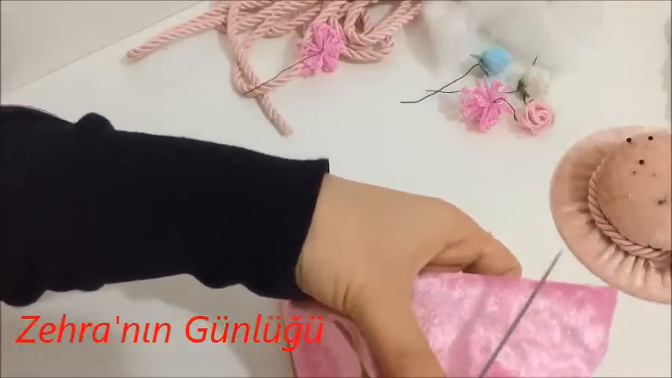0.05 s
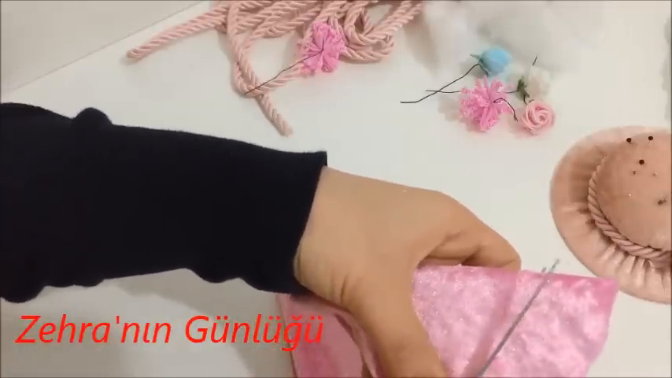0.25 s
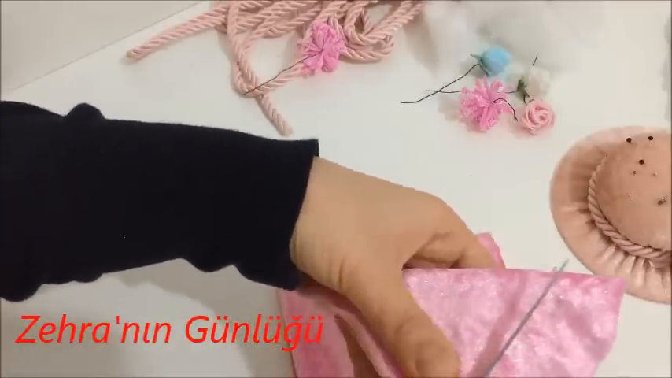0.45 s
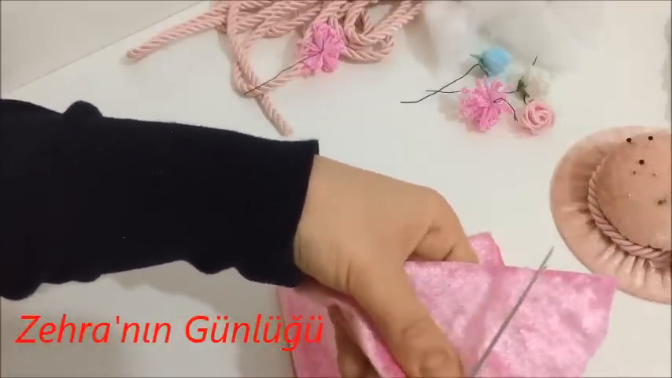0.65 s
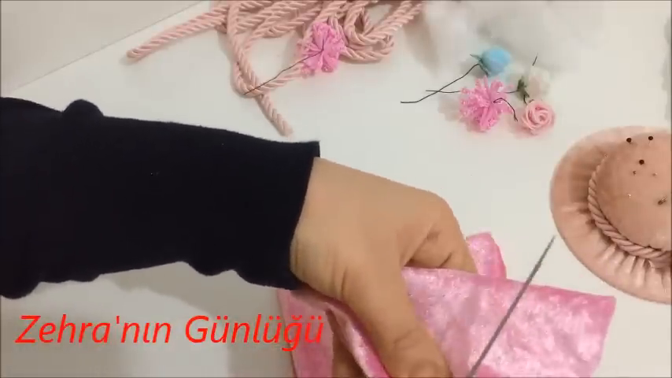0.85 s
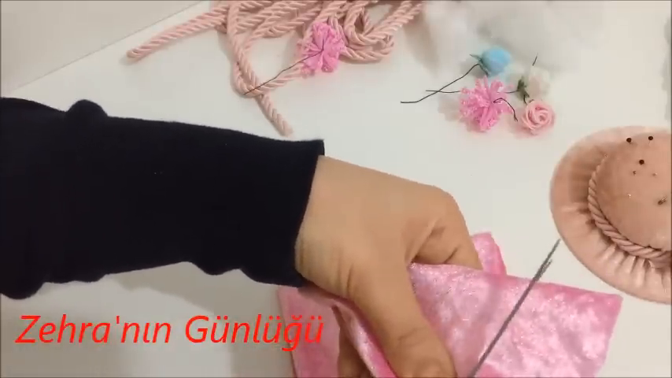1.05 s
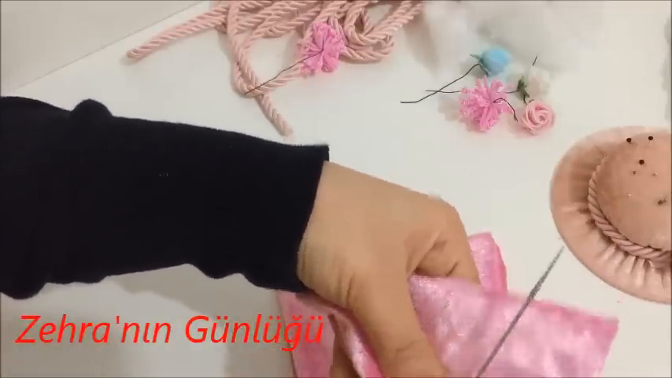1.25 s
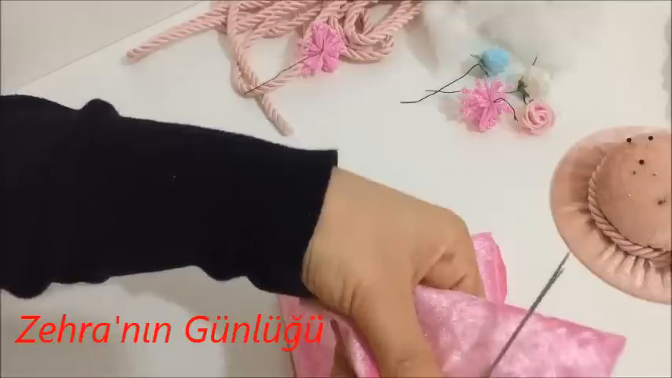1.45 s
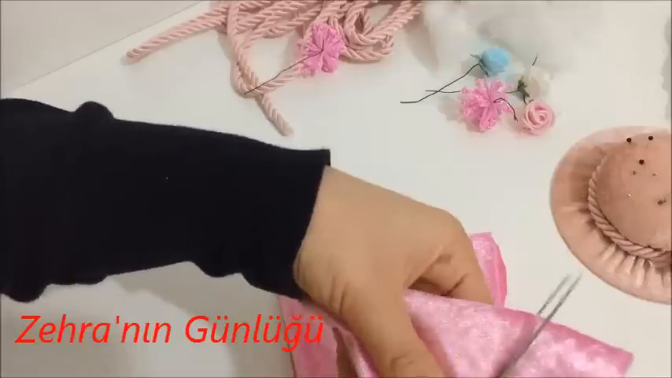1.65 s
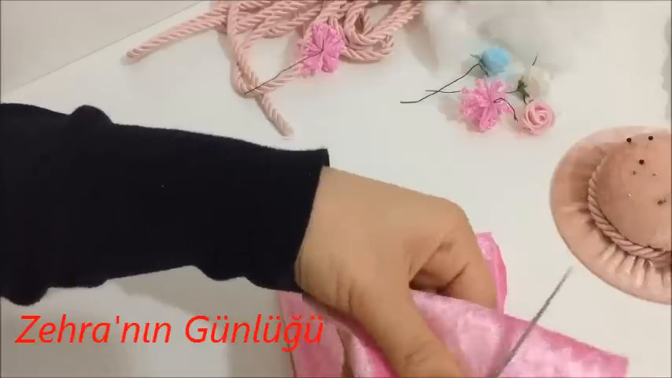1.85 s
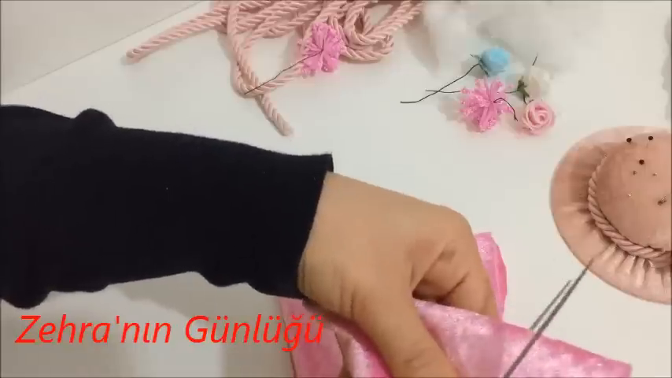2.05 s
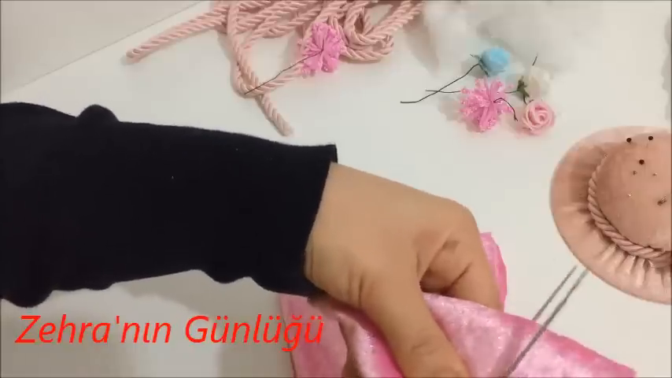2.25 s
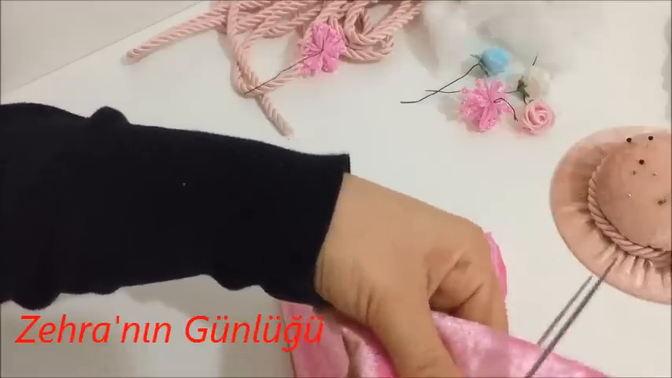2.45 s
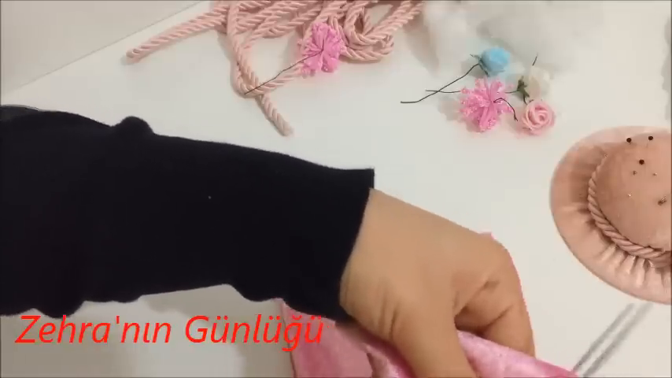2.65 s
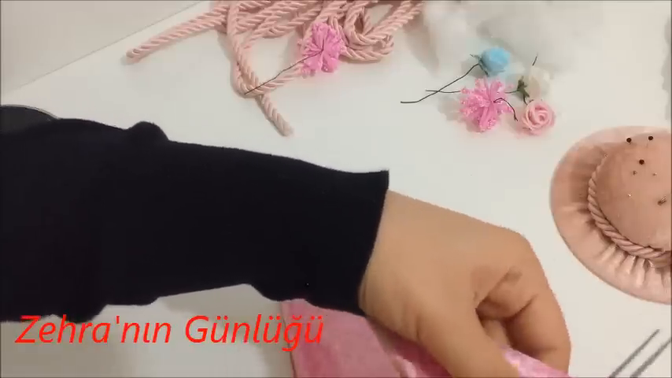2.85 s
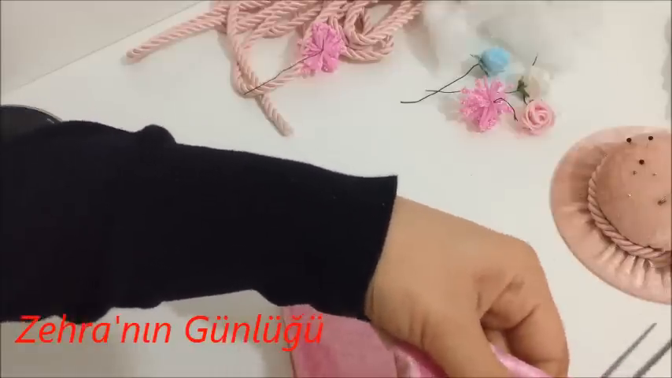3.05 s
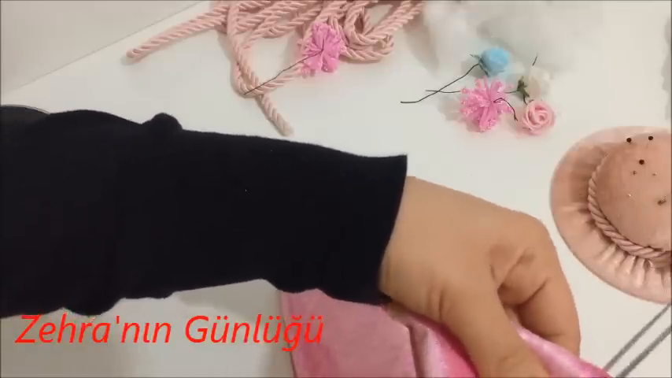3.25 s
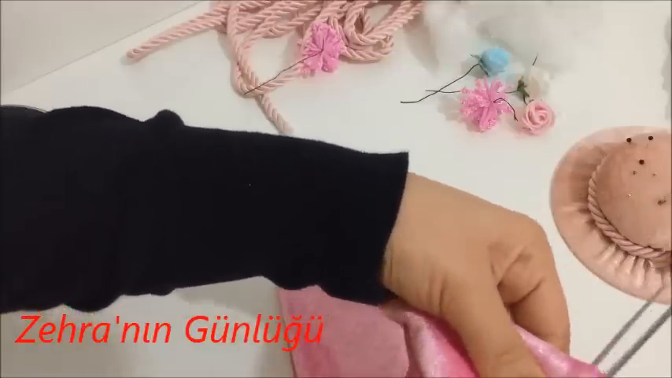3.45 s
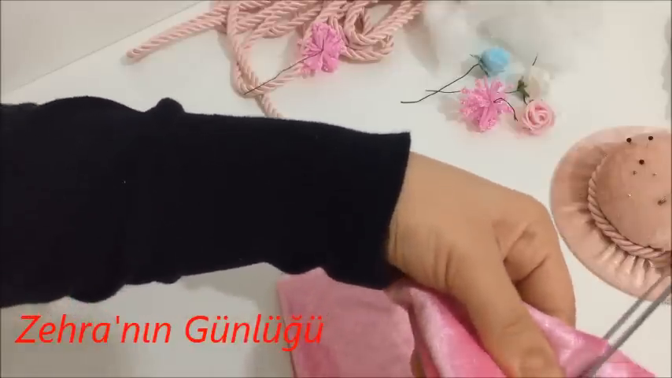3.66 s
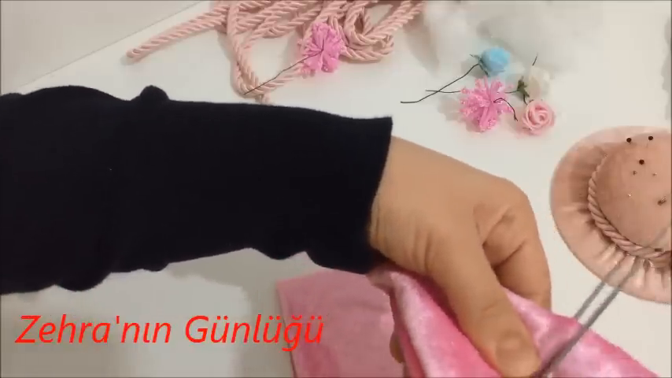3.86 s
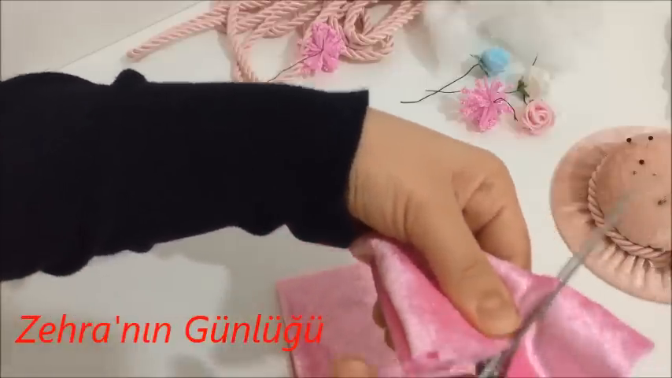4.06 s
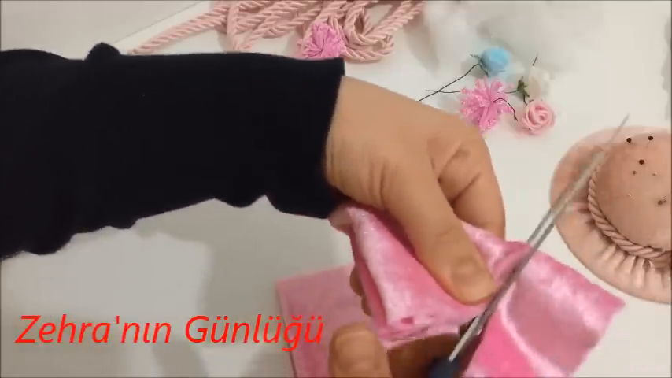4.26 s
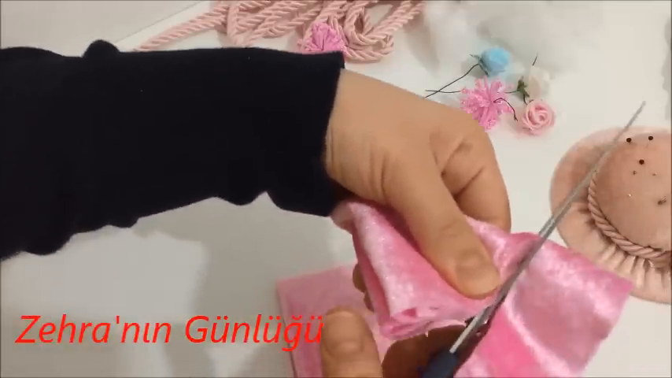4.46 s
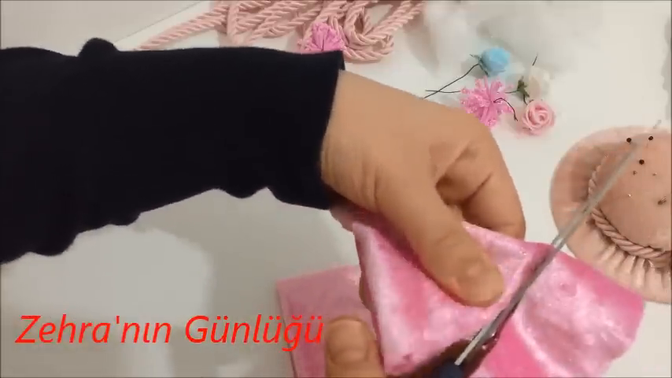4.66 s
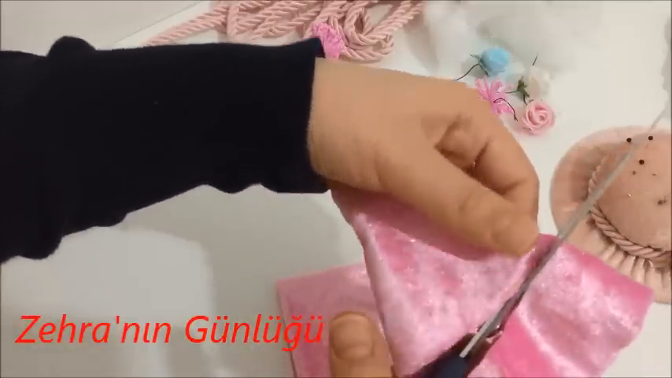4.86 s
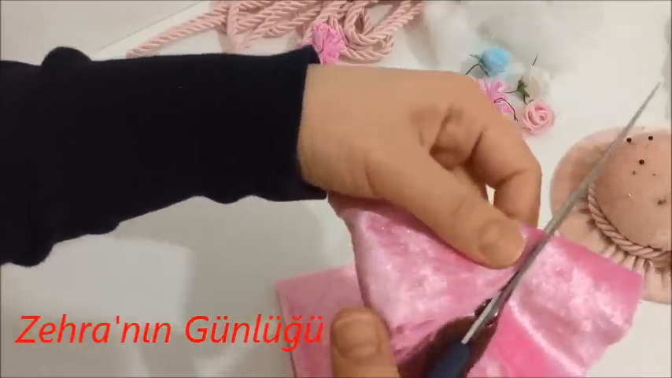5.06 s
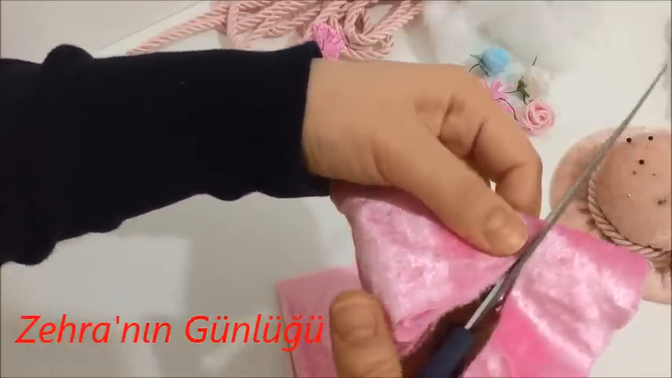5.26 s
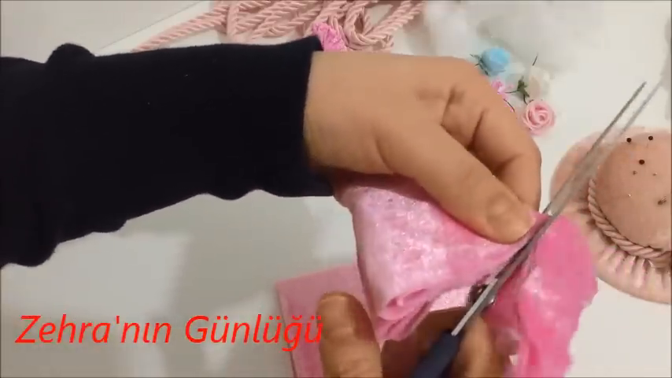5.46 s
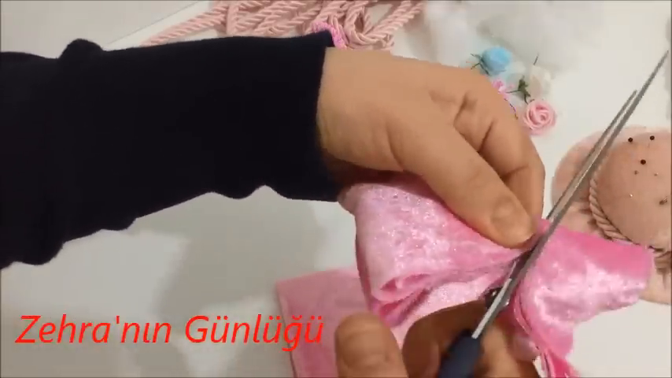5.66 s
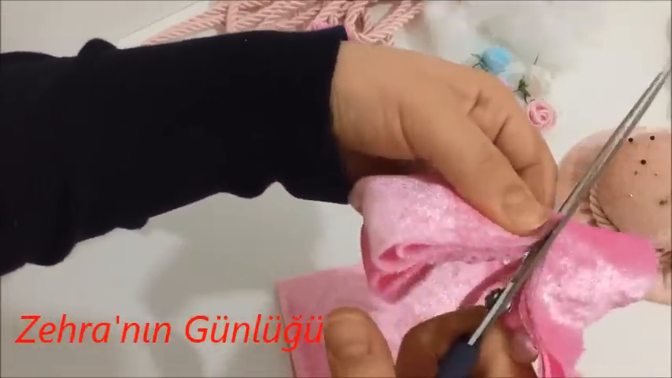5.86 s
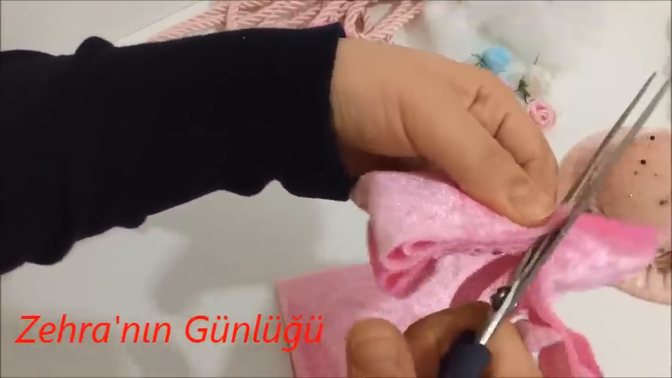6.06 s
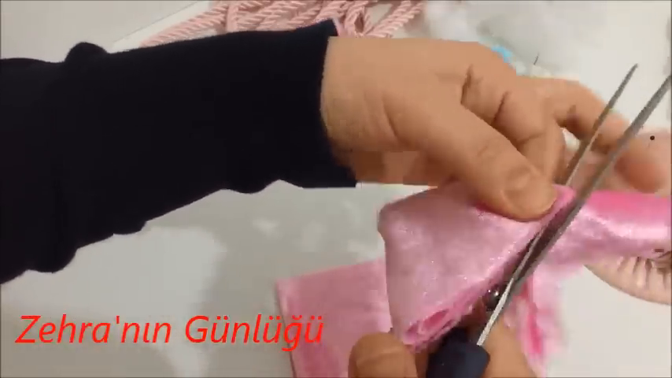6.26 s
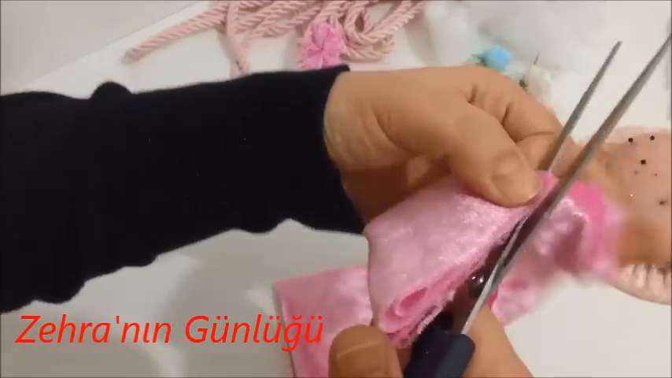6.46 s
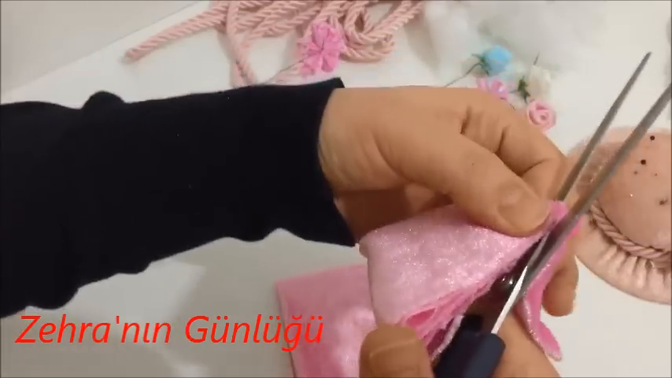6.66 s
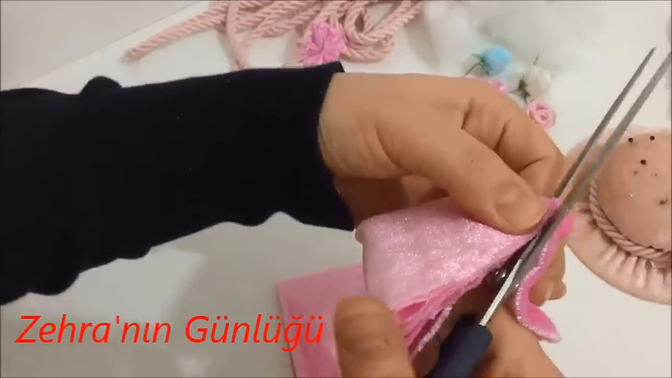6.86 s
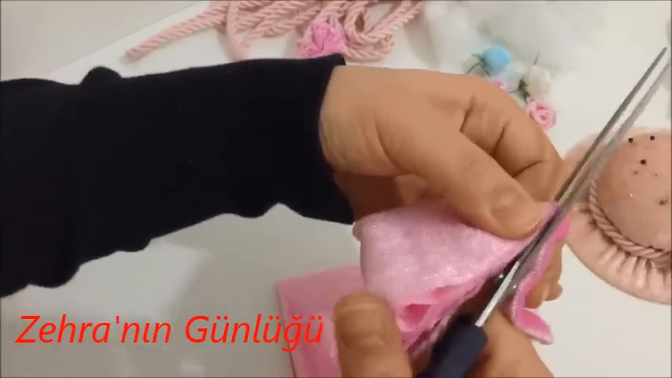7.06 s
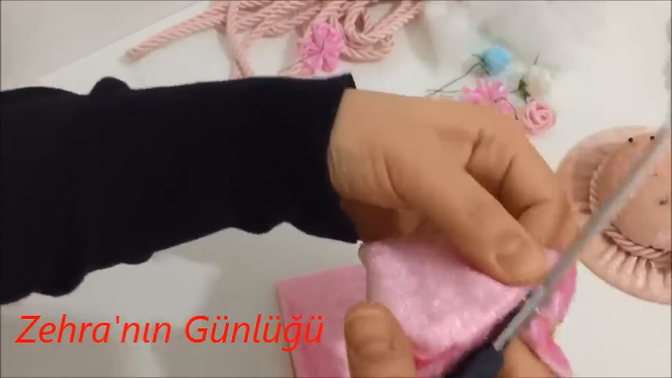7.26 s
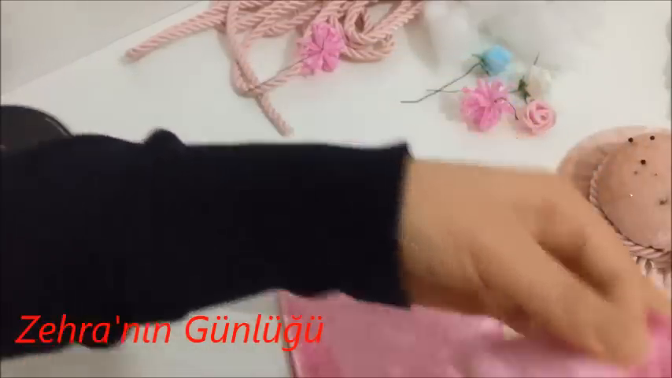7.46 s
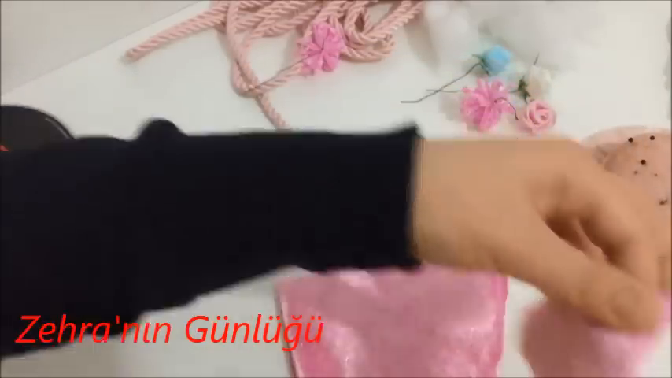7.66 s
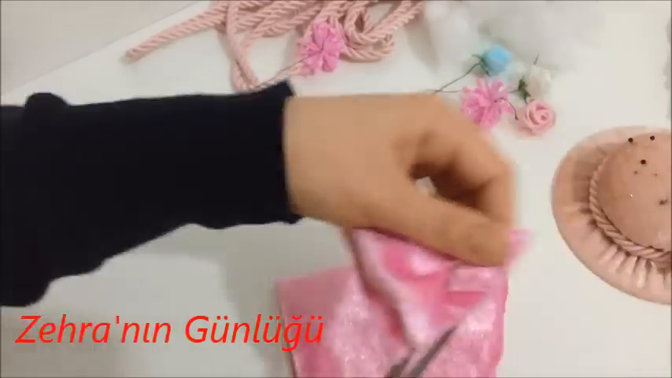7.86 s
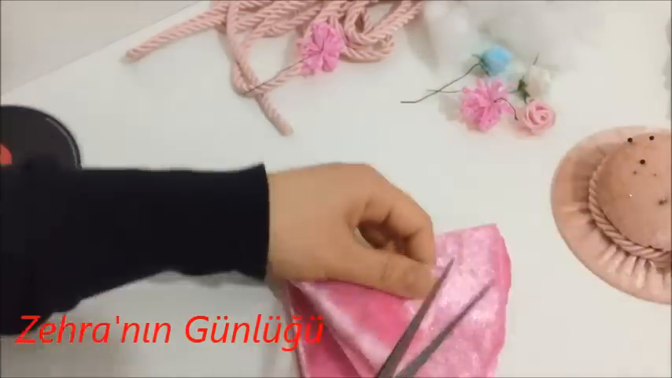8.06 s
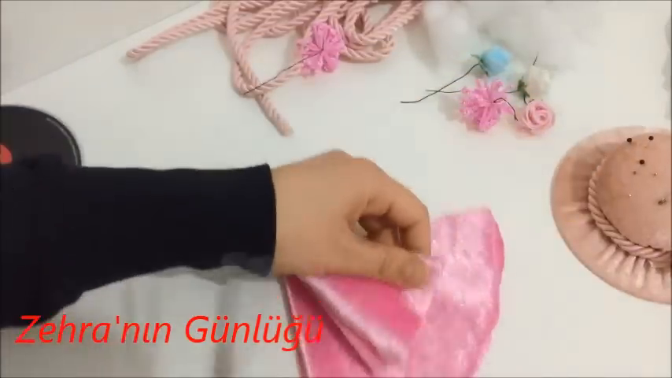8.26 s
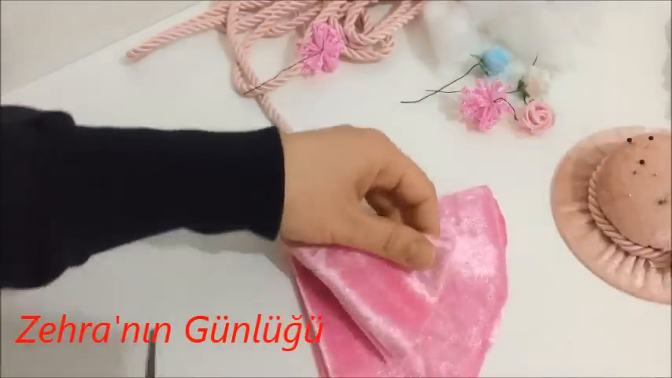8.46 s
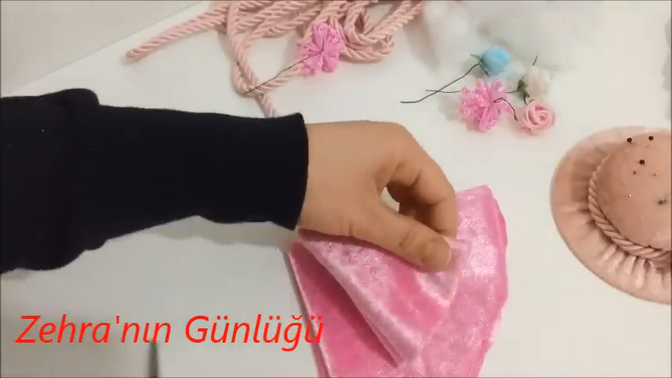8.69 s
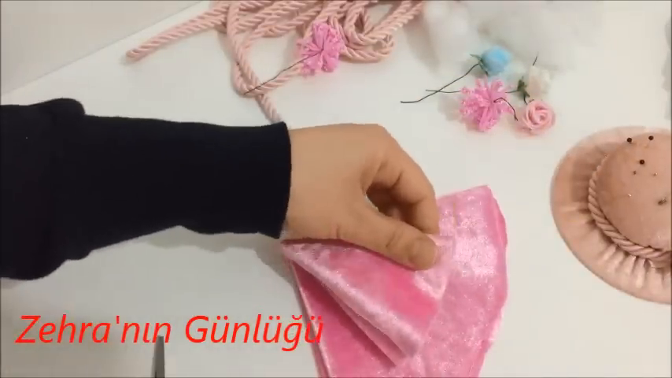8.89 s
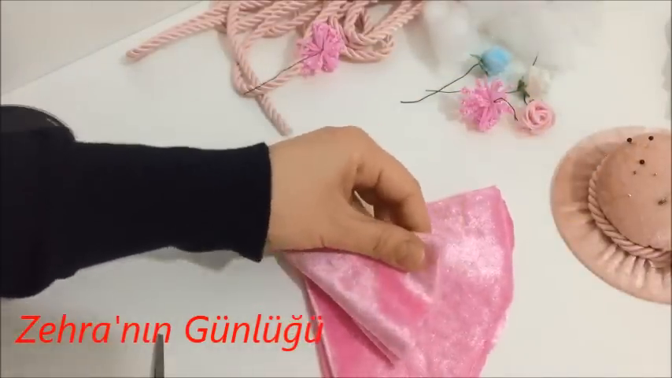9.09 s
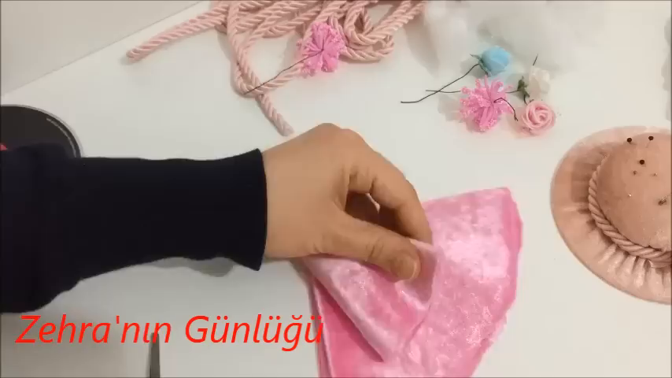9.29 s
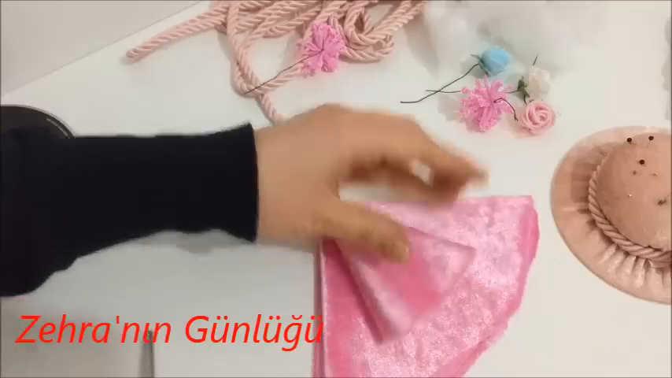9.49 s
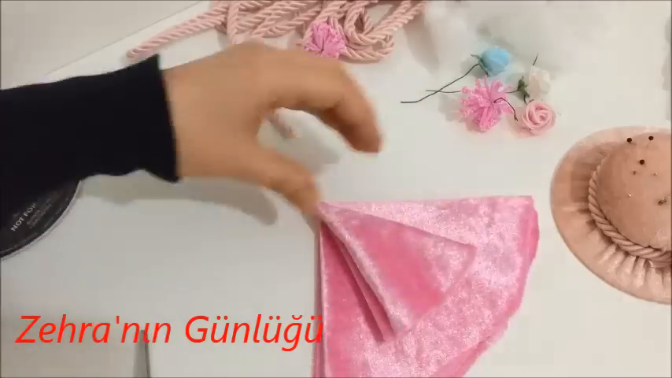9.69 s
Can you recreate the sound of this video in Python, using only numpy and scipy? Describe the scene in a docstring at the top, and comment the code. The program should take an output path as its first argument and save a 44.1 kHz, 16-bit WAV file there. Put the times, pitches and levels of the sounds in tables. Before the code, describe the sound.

Scissors snip repeatedly through folded cloth in a quiet room, with crunchy metallic shearing, then are set down on the table with a hard rattling knock.

```python
"""Over a steady hush, scissors snip through folded cloth on a table in a quiet room.
Opening blades only hiss; closing blades shear threads in uneven slips that ring the steel.
Light ticks and scuffs come between; after six seconds a far thump sounds through the floor.
Late on the pivot squeaks, then the scissors and other small things are set down on the
table top, whose blows, scuffs and last rattle ring decaying modes."""
import sys
import numpy as np
from scipy import signal
from scipy.fft import rfft, irfft
from scipy.io import wavfile

SR = 44100
rng = np.random.default_rng(int(sys.argv[2]) if len(sys.argv) > 2 else 0)


def transcribe(signal):
    """Save signal, clipped to [-1, 1], as a 16-bit WAV file at the path in sys.argv[1]."""
    frames = np.atleast_2d(signal).T
    limited = np.clip(frames, -1, 1)
    pcm = np.round(limited * 32767).astype(np.int16)
    wavfile.write(sys.argv[1], SR, pcm)


def elevation(decibels):
    """Turn decibel levels (scalar or array-like) into linear amplitude ratios."""
    levels = np.asarray(decibels, float)
    return 10 ** (levels / 20)


N = 429093


def rms_one(x):
    """Scale to rms 1."""
    return x / np.sqrt(np.mean(x ** 2) + 1e-20)


def at_hz(points, hz):
    """Read a (Hz, value) table on a log-frequency axis."""
    table_hz, values = np.transpose(points)
    return np.interp(np.log(hz), np.log(table_hz), values)


def coloured(points, size):
    """Noise with the given spectrum, rms 1."""
    hz = np.arange(size // 2 + 1) * SR / size + 1
    spectrum = rfft(rng.standard_normal(size)) * elevation(at_hz(points, hz))
    return rms_one(irfft(spectrum, size))


def ring(clicks, hz, t60_s):
    """A damped mode: a unit click sets a decaying sine of height 1 ringing."""
    r, w = elevation(-60 / (t60_s * SR)), 2 * np.pi * hz / SR
    return signal.lfilter([0, np.sin(w)], [1, -2 * r * np.cos(w), r * r], clicks + 1e-18)


def resonance(x, hz, width_hz, state=None):
    """Band-pass of gain 1 on top; returns its state too when given one."""
    r = np.exp(-np.pi * width_hz / SR)
    top = np.array([1, 0, -1]) * (1 - r * r) / 2
    return signal.lfilter(top, [1, -2 * r * np.cos(2 * np.pi * hz / SR), r * r], x, zi=state)


def flicker(per_s, depth_db):
    """A gain that wanders at random between knots."""
    knots = rng.standard_normal(4000)
    return elevation(depth_db * np.interp(np.arange(N) * per_s / SR, np.arange(4000), knots))


# Closing strokes. Each row: start in seconds, end in seconds, shearing force in dB,
# free blade pitch at the end in Hz, low ring that the grip leaves freest in Hz.
STROKES = [(0.226, 0.353, -63.5, 9700, 3640), (1.102, 1.256, -65.5, 9400, 3480),
           (1.522, 1.659, -60, 9600, 2940), (2.203, 2.357, -65, 9400, 3680),
           (2.633, 2.78, -61.5, 8900, 3530), (3.265, 3.391, -60.5, 9600, 3480),
           (3.647, 3.846, -67.5, 9800, 4680), (4.1, 4.248, -61.5, 10300, 4550),
           (4.477, 4.66, -66.5, 9600, 4470), (5.338, 5.511, -65.5, 9500, 3420),
           (5.897, 5.98, -63.5, 9100, 3600), (6.98, 7.03, -68.5, 9000, 2750),
           (7.03, 7.079, -56, 9150, 2870), (7.286, 7.326, -63.5, 8700, 3730),
           (7.48, 7.565, -75, 9500, 1250), (8.383, 8.46, -74.5, 8650, 3560)]
# Distinct slips as threads give way, strong and faint. Each row: peak in seconds,
# force on the high rings in dB, force on the low rings against it in dB.
SLIPS = [(0.2576, -60, -13), (0.2956, -60, -4), (0.315, -51, -7), (0.326, -55, -4), (1.158, -55, -7),
         (1.224, -58, -3), (1.234, -52, -3), (1.5769, -46.5, -5), (1.616, -50.5, -5), (1.648, -58, -3),
         (1.667, -54.5, -5), (2.2706, -52.5, -7.5), (2.3136, -64, 0), (2.3295, -55, -7), (2.362, -57, -15),
         (2.697, -51, -11), (2.7615, -54, -4), (3.3258, -51.5, -12), (3.3926, -56, -1),
         (3.7288, -52.5, -16), (3.7883, -54, -3), (3.8237, -53.5, -5.5), (4.1642, -63, -6),
         (4.2316, -58.5, 1), (4.262, -60, -3.5), (4.598, -58.5, -4), (4.6325, -53.5, -8),
         (5.4205, -59.5, -5), (5.48, -74, 8), (5.5158, -63.5, 3), (6.025, -60, -9), (7.052, -56, 3),
         (7.06, -44, -10), (7.067, -64, 1), (7.306, -69, -8), (7.325, -54.5, -5), (7.5133, -57.5, -20),
         (8.4672, -62, -8)]


def shearing_force():
    """Strokes build up and die away; slips burst out sharply and die away a little more slowly."""
    low_db, low_full_s = -2.5, 0.15   # strokes shorter than low_full_s stir the low rings less
    bite_share, let_go_share = 0.62, 0.14   # shares of a stroke
    free_open_hz = 8400
    small_per_s, small_db, small_spread_db = 31, -1.5, 4.5   # dB over the stroke
    slip_s, half = 0.0016, 600

    force = np.zeros((2, N))   # on the low and on the high rings
    free_hz, freest_hz = np.full(N, 9000.), np.full(N, 3000.)
    for start_s, end_s, level_db, end_hz, ring_hz in STROKES:
        start, end = round(start_s * SR), round(end_s * SR)
        freest_hz[start - 400:] = ring_hz
        u = np.linspace(0, 1, end - start)
        low_share = elevation(low_db) * min(1, (end_s - start_s) / low_full_s)
        swell = np.clip(u / bite_share, 0, 1) * np.clip((1 - u) / let_go_share, 0, 1)
        force[:, start:end] = elevation(level_db) * np.array([[low_share], [1]]) * swell
        # pitch rises, fast at first, as the free length shortens
        closed = np.minimum(np.arange(N - start) / len(u), 1)
        free_hz[start:] = free_open_hz + (end_hz - free_open_hz) * np.sqrt(closed)

    u = np.arange(-half, half) / SR / slip_s
    give = 1 / np.cosh(u * np.where(u > 0, .8, 1.2))
    small = elevation(small_db + small_spread_db * rng.standard_normal((2, N)))
    small = small * (rng.random(N) < small_per_s / SR)
    small_slips = signal.fftconvolve(force * small, give[None], "same").clip(0)
    force = force * flicker(170, depth_db=1.5) + small_slips
    for s, high_db, low_db in SLIPS:
        i = round(s * SR)
        force[:, i - half:i + half] += elevation([[high_db + low_db], [high_db]]) * give
    return force, free_hz, freest_hz


def fixed_rings(snaps, rings, freest_hz):
    """Grip and cutting point move, so each fixed resonance comes and goes."""
    freest_db = 9
    out = np.zeros(N)
    for k, (hz, width_hz, level_db) in enumerate(rings):
        band = resonance(resonance(snaps, hz, width_hz), hz, 2 * width_hz)
        freedom = np.exp(-(np.log(hz / freest_hz) / .12) ** 2)
        gain = elevation(level_db + freest_db * freedom) * flicker(25, depth_db=4.5)
        out += (-1) ** k * gain * rms_one(band)
    return out


# Fixed resonances of the scissors, low and high. Each row: centre in Hz,
# width of the first of two filters in Hz (the second is twice as wide), relative level in dB.
LOW_RINGS = [(1230, 290, -6.5), (1603, 130, -9.5), (2310, 350, -7.5), (2665, 380, 2.5), (3736, 530, -2),
             (4550, 380, -6)]
BLADES = [(5800, 450, -5), (6700, 400, -11), (8050, 300, -3), (11300, 900, -6), (12500, 900, -14),
          (13600, 900, -10), (14900, 900, -5)]


def shearing(per_s=9000, spread_db=2.2, free_width_hz=450, free_db=3, broad_db=-17):
    """Snapping threads are dense clicks; they ring the steel, whose free length shifts pitch."""
    force, free_hz, freest_hz = shearing_force()
    snaps = (rng.random(N) < per_s / SR) * elevation(spread_db * rng.exponential(1, N))
    snaps = snaps * rng.choice([-1, 1], N)
    low = fixed_rings(snaps, LOW_RINGS, freest_hz)
    high = fixed_rings(snaps, BLADES, freest_hz)
    state, free = np.zeros(2), np.zeros(N)
    for i in range(0, N, 256):
        free[i:i + 256], state = resonance(snaps[i:i + 256], free_hz[i], free_width_hz, state)
    broad = np.diff(snaps, prepend=0)
    high = high + elevation(free_db) * rms_one(free) + elevation(broad_db) * rms_one(broad)
    return force[0] * rms_one(low) + force[1] * rms_one(high)


# Opening strokes. Each row: start in seconds, level at the top of the swell before flicker in dB.
OPENINGS = [(0.077, -73), (.9, -81), (1.36, -69.5), (2.474, -70.5), (3.535, -73), (3.953, -69),
            (4.361, -68.5), (5.15, -78), (6.2, -75.5), (6.66, -75), (7.175, -69)]
# Spectrum of steel sliding on steel. Each row: frequency in Hz, relative density in dB per Hz.
SLIDE = [(900, -14), (2500, -2), (6000, -4), (10000, -4), (15000, -5.5)]


def sliding(opening_s=0.115):
    """Steel slides on steel: a soft swell of hiss for each opening."""
    swell, shape = np.zeros(N), np.hanning(round(opening_s * SR))
    for s, level_db in OPENINGS:
        swell[round(s * SR):][:len(shape)] = elevation(level_db) * shape
    return swell * flicker(60, depth_db=2.5) * coloured(SLIDE, N + 1)[:N]


# Blows on the table top. Each row: time in seconds, then drive in dB of boom, thud, board,
# handle and steel.
KNOCKS = [(8.642, -56, -37.5, -76, -36.5, -59.5), (8.727, -72, -52.5, -44, -46, -84),
          (8.866, -40.5, -42, -42.5, -41, -40), (8.881, -39.5, -71, -49, -50.5, -52),
          (8.964, -63, -79, -54.5, -64, -71), (9.616, -27.5, -56, -11, -20, -24),
          (9.626, -33.5, -53, -47, -28, -14), (9.637, -27.5, -43, -19.5, -26.5, -42),
          (9.66, -32, -44, -25.5, -26, -26.5)]
# Ticks of the scissors in the hand. Each row: time in seconds, then drive in dB of board,
# handle and steel.
TICKS = [(.785, -69, -66, -70), (6.223, -92, -56, -63.5), (7.372, -70, -68, -68), (7.404, -78, -63, -66),
         (7.425, -61, -52.5, -69), (7.512, -69, -62, -71), (8.4655, -72, -52.5, -51)]
# Brief scuffs, and a rattle after the hardest blow. Each row: start in seconds, end in seconds,
# then drive in dB of board, handle and steel.
SCUFFS = [(6.216, 6.241, -100, -76, -76), (7.41, 7.437, -83, -67.5, -77), (9.334, 9.365, -69, -72.5, -75),
          (9.596, 9.622, -61, -66, -71.5), (9.63, 9.686, -42.5, -44, -49)]
# Modes of each part. Each row: frequency in Hz, relative level in dB, t60 in seconds.
BOOM = [(148.3, -8.5, 0.34), (168.6, 6, 0.23), (191.5, 1, 0.23)]
THUD = [(424, -15, 0.033), (450, -2.5, 0.076), (476, -7, 0.09)]
BOARD = [(624, -17.5, 0.16), (632, -6.5, 0.08), (699, 3, 0.028), (762, -9.5, 0.046), (901, -12.5, 0.096)]
HANDLE = [(1237, -8.5, 0.05), (1347, -6.5, 0.039), (1505, 0, 0.024), (1755, 5.5, 0.0032),
          (1960, -6.5, 0.026), (2234, 8, 0.012), (2680, -14, 0.0068)]
STEEL = [(3380, 3.5, 0.008), (3510, 8, 0.0039), (4140, 2, 0.012), (4370, 1, 0.012), (5110, 0.5, 0.011),
         (5940, -6, 0.011), (6530, -4.5, 0.011), (7700, -4.5, 0.0036), (9100, -3.5, 0.0039),
         (10300, -9, 0.0038), (14900, 0, 0.0015)]


def knocks(contact_s=0.0015, soft=2.2, grit_per_s=900, low_cut_hz=125):
    """Blows strike each mode with a strength of its own; scuffs and rattle are dense small blows."""
    light = [(s, -np.inf, -np.inf, *part_db) for s, *part_db in TICKS]   # no boom or thud
    blows, out = np.array(light + KNOCKS), np.zeros(N)
    at = np.round(blows[:, 0] * SR).astype(int)
    grit = (rng.random(N) < grit_per_s / SR) * rng.standard_normal(N)
    for k, part in enumerate([BOOM, THUD, BOARD, HANDLE, STEEL]):
        loose = k > 2   # handle and steel
        grit_gain = np.zeros(N)
        if k > 1:   # too light for boom and thud
            for start_s, end_s, *part_db in SCUFFS:
                grit_gain[round(start_s * SR):round(end_s * SR)] = elevation(part_db[k - 2])
        for j, (hz, level_db, t60_s) in enumerate(part):
            clicks = grit * grit_gain * elevation(level_db)
            clicks[at] += elevation(blows[:, 1 + k] + level_db + 2 * rng.standard_normal(len(at)))
            # the contact is soft on the scale of each mode
            r = np.exp(-2 * np.pi * soft * hz / SR)
            clicks = signal.lfilter([(1 - r) ** 2], [1, -2 * r, r * r], clicks + 1e-18)
            lag = int(rng.random() * contact_s * SR) * loose   # loose parts rattle
            sign = (-1) ** (j * loose)
            out[lag:] += sign * ring(clicks, hz, t60_s)[:N - lag]
    # the knocks are thinned below low_cut_hz
    return signal.sosfilt(signal.butter(4, low_cut_hz, "high", fs=SR, output="sos"), out)


# Squeak of the pivot. Each row: time in seconds, pitch in Hz, level of the fundamental in dB,
# octave against it in dB.
SQUEAK = [(8.437, 1500, -66, -8), (8.445, 1510, -52, -9), (8.452, 1570, -56, -1), (8.459, 1790, -57, 9),
          (8.462, 1820, -75, 9)]


def squeak(rough=0.7):
    """Stick-slip tone, roughened by noise, whose octave takes over as it rises."""
    t = np.arange(N) / SR
    s, hz, level_db, octave_db = np.transpose(SQUEAK)
    phase = 2 * np.pi * np.cumsum(np.interp(t, s, hz)) / SR
    tone = np.sin(phase) + elevation(np.interp(t, s, octave_db)) * np.sin(2 * phase)
    tone = tone * (1 + rough * rng.standard_normal(N))
    return elevation(np.interp(t, s, level_db, -200, -200)) * tone


# Modes of the far thump. Each row: frequency in Hz, drive in dB, t60 in seconds.
THUMP = [(80, -54, .4), (100, -57, .3), (165, -50, .42), (215, -58, .2), (265, -57, .1)]


def thump(start_s=6.462, build_s=0.039):
    """A far blow through the floor arrives over several paths, so low modes build up unevenly."""
    push = np.zeros(N)
    delays = (np.array([0, .3, .8, 1.6]) * build_s * SR).astype(int)
    push[round(start_s * SR) + delays] = [0.81, 0.51, 0.53, 0.98]
    rings = np.zeros(N)
    for k, (hz, level_db, t60_s) in enumerate(THUMP):
        rings += (-1) ** k * elevation(level_db) * ring(push, hz, t60_s)
    return signal.sosfilt(signal.butter(3, [60, 320], "band", fs=SR, output="sos"), rings)


# Spectrum of the hush. Each row: frequency in Hz, relative density in dB per Hz.
HUSH = [(15, -34), (25, -8.5), (69, 2.5), (204, -1.5), (762, -11.5), (2420, -14.5), (4260, -16.5),
        (4870, -19.5), (5880, -18.5), (8810, -21.5), (10400, -24.5), (11500, -23.5), (15500, -23.5)]


def hush(level_db=-69):
    """Steady coloured noise."""
    return elevation(level_db) * coloured(HUSH, N + 1)[:N]


# Decay of the room. Each row: frequency in Hz, t60 in seconds.
ROOM_T60 = [(200, 0.28), (1000, 0.34), (4000, 0.15), (12000, 0.27)]


def room(x, level_db=-6, gap_s=0.0012):
    """Dense reflections: octave bands of noise, each dying at its own rate."""
    t = np.arange(SR // 2) / SR
    tail = np.zeros(len(t))
    for hz in 125 * 2. ** np.arange(7):
        top_hz = min(hz * 2 ** .5 * (1 + (hz > 7000)), .45 * SR)   # the last band reaches higher
        band = signal.butter(2, [hz / 2 ** .5, top_hz], "band", fs=SR, output="sos")
        noise = signal.sosfilt(band, rng.standard_normal(len(t)))
        tail += noise * elevation(-60 * t / at_hz(ROOM_T60, hz))
    tail = tail * np.clip(t / gap_s - 1, 0, 1)
    return elevation(level_db) * signal.fftconvolve(x, tail / np.sqrt(np.sum(tail ** 2)))[:N]


def scene(on_table_s=8.6, in_hand_db=-5, top_hz=16050):
    """Direct sounds, their room, the far thump and the hush."""
    blows = knocks()
    steel = shearing() + sliding() + squeak()
    top_cut = signal.cheby2(12, 50, top_hz, fs=SR, output="sos")
    steel, background = signal.sosfilt(top_cut, [steel, hush()])
    # until set down, less goes to the room
    send = np.where(np.arange(N) < on_table_s * SR, elevation(in_hand_db), 1)
    send_band = signal.butter(1, [330, 6000], "band", fs=SR, output="sos")
    sent = signal.sosfilt(send_band, send * (blows + steel))
    return (blows + steel + room(sent) + thump() + background)[None]


def band_limit(x):
    """A steep low-pass at the top of the band."""
    return signal.sosfilt(signal.butter(12, 16810, fs=SR, output="sos"), x)


# Narrow dip of the microphone. One row: centre in Hz, width in Hz, depth as a share from 0 to 1.
MIC_DIP = (14000, 350, 0.97)


def record(dry):
    """The microphone has a narrow dip in its treble; the top is cut."""
    hz, width_hz, depth = MIC_DIP
    heard = dry - depth * resonance(dry, hz, width_hz)
    heard = signal.sosfilt(signal.cheby2(12, 60, 17000, fs=SR, output="sos"), heard)
    return band_limit(heard)


dry = scene()
out = record(dry)
transcribe(out)
```